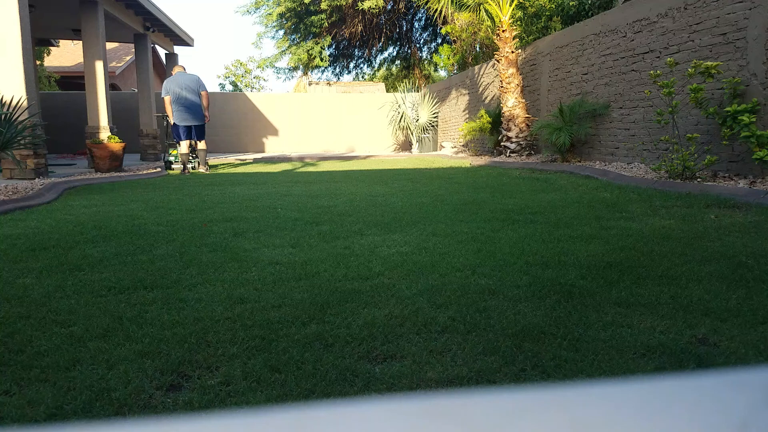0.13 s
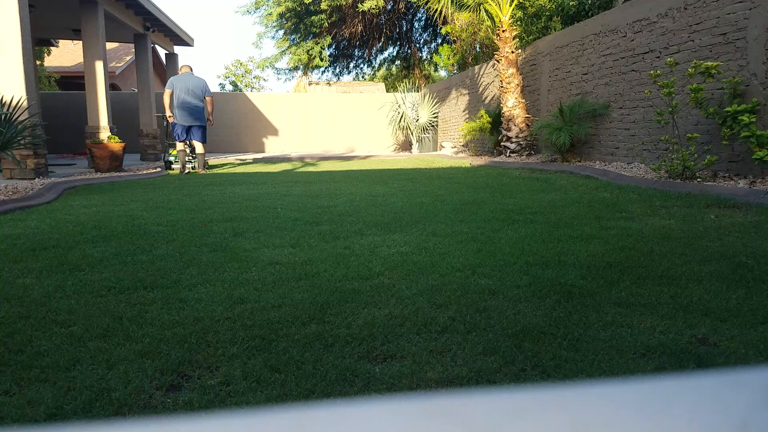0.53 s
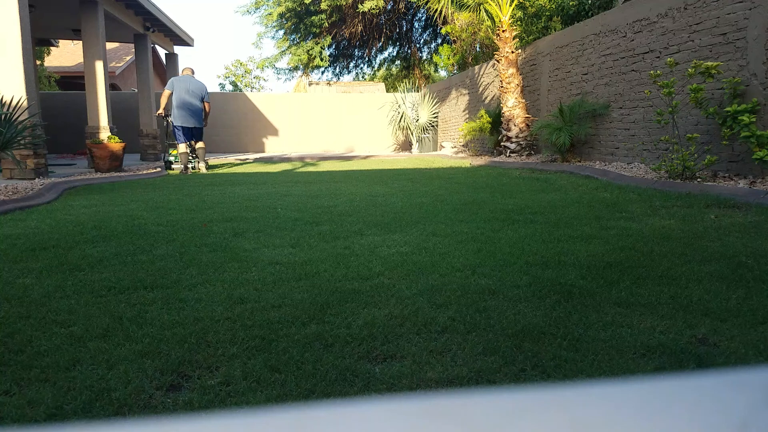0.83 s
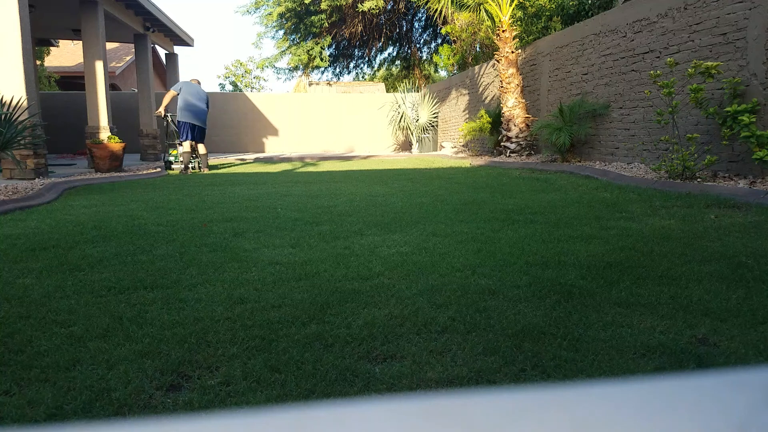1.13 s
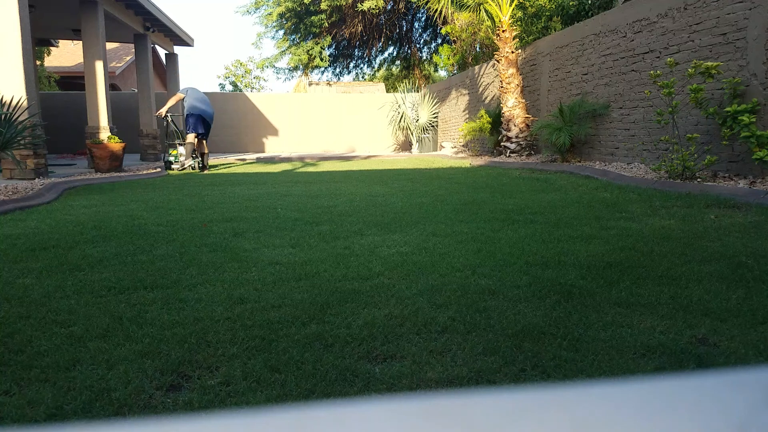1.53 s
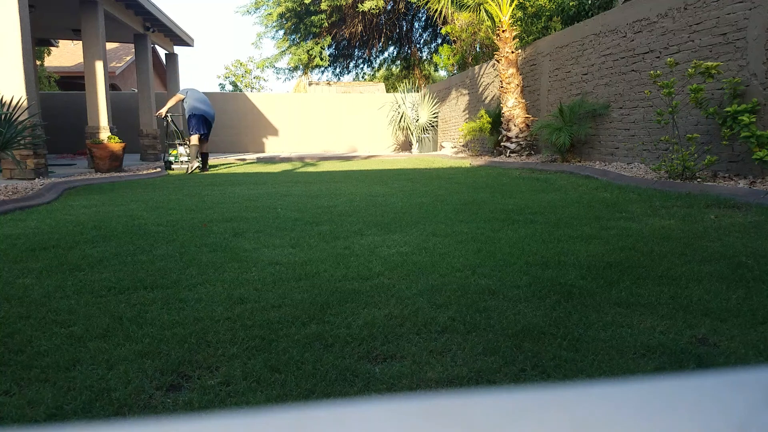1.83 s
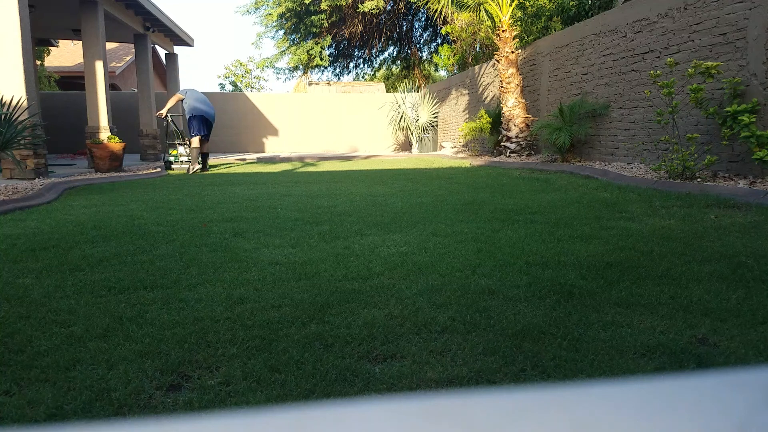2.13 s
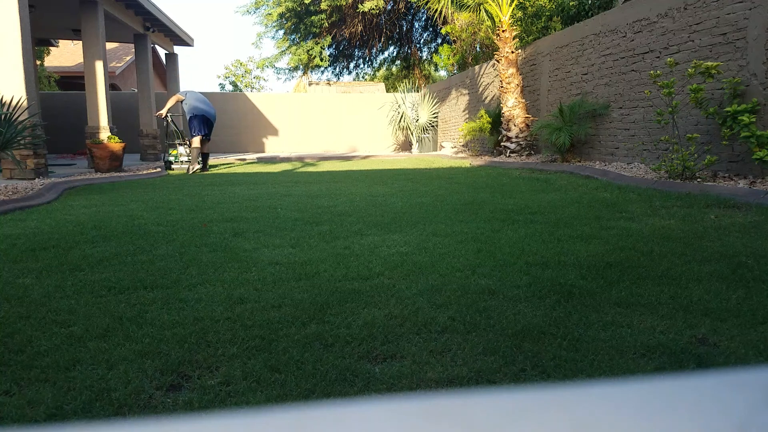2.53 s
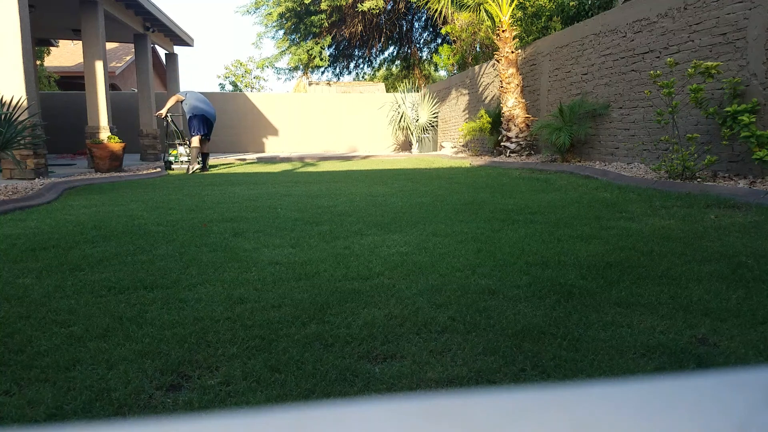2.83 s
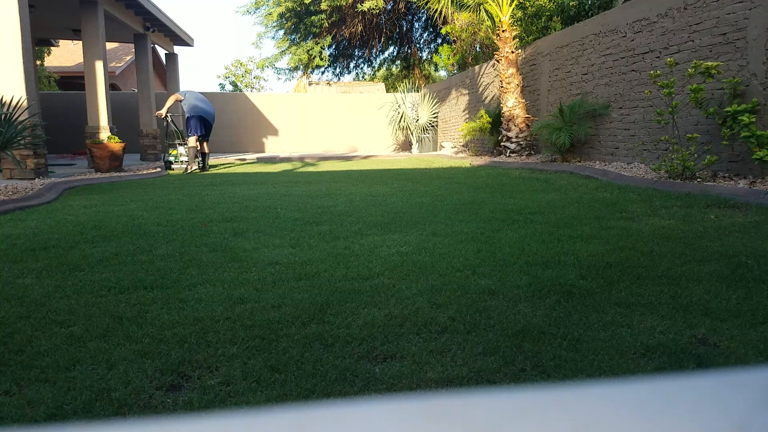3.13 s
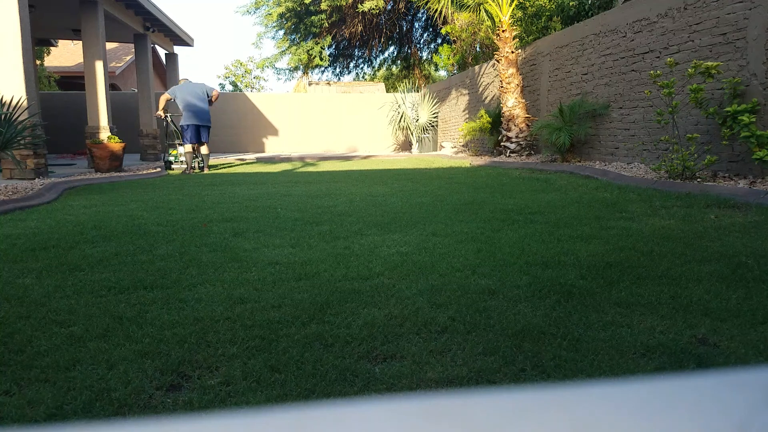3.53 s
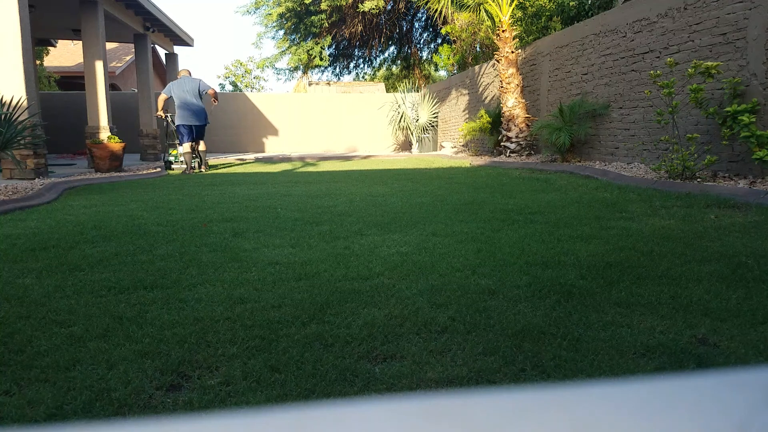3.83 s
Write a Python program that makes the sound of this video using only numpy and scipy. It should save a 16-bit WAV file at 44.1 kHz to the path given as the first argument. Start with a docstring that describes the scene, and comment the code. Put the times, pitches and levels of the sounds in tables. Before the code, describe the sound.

A lawn mower is pull-started at the far end of a walled backyard, heard in stereo. First a low hum fades and the handle clacks, then the cord hisses out and the engine rattles and begins firing.

```python
"""A walled backyard, heard through a stereo microphone with a mower at the far end.
A low machine hum and a faint insect lie over the outdoor air. The mower's handle clacks, the starter
cord hisses out, and the engine rattles round, catches and gathers speed. Each firing sends a pulse
and a gush of gas through the muffler, and the garden walls throw every one back."""
import sys
import numpy as np
from scipy import signal
from scipy.fft import rfft, irfft, next_fast_len
from scipy.io import wavfile
from scipy.ndimage import map_coordinates

SR = 44100
rng = np.random.default_rng(int(sys.argv[2]) if len(sys.argv) > 2 else 0)


def unload_audio(sound):
    """Save the sound as a 16-bit wav file, at the path given as the first command line argument."""
    columns = np.transpose(np.atleast_2d(sound))
    # keep every value between -1 and 1, then stretch to whole-number steps
    steps = np.round(np.clip(columns, -1, 1) * 32767)
    wavfile.write(sys.argv[1], SR, steps.astype(np.int16))


N = 176400
T = np.arange(N) / SR
SIDES = np.array([[.5], [-.5]])  # splits a difference between left and right

# the mower's balance at the microphone (frequency [Hz], left minus right [dB])
MOWER_BALANCE = [(100, -3.5), (380, -3), (700, 1), (1300, -4), (2400, -2.5), (4400, 1.5), (8000, 2.3),
                 (15000, 7)]


def amp(db):
    """Decibels to gain."""
    return 10 ** (np.asarray(db) / 20)


def unit(x):
    """Scale to rms 1."""
    return x / np.sqrt(np.mean(x ** 2) + 1e-20)


def along(points, hz):
    """Read (frequency [Hz], value) points on a log axis."""
    f, v = np.transpose(points)
    return np.interp(np.log(hz + 1), np.log(f + 1), v)


def curve(rows):
    """Join (time [s], value) points, one value per sample."""
    return np.interp(T, *np.transpose(rows))


def wobble(rate):
    """A smooth random curve, rate knots a second."""
    return map_coordinates(rng.standard_normal(400), [T * rate], mode="wrap")


def decay(start_s, t60_s):
    """Gain 1 until start_s, then falling 60 dB every t60_s."""
    return amp(-60 * np.maximum(T - start_s, 0) / t60_s)


def burst(start_s, attack_s, t60_s, hold_s=0):
    """A linear attack, with a decay that begins hold_s after the start."""
    return np.clip((T - start_s) / attack_s, 0, 1) * decay(start_s + hold_s, t60_s)


def filtered(x, response):
    """Apply a complex response, given as a function of frequency."""
    size = next_fast_len(N + SR // 2)
    return irfft(rfft(x, size) * response(np.fft.rfftfreq(size, 1 / SR)), size)[..., :N]


def coloured(x, spectrum):
    """Pass x through a minimum-phase filter with this spectral shape."""
    size = 16384
    cepstrum = irfft(np.log(amp(along(spectrum, np.fft.rfftfreq(size, 1 / SR)))))
    cepstrum[1:size // 2] *= 2
    cepstrum[size // 2 + 1:] = 0
    response = irfft(np.exp(rfft(cepstrum)))
    return signal.fftconvolve(x, response / np.linalg.norm(response))[:N]


def noise(spectrum):
    """Coloured noise of rms 1."""
    return unit(coloured(rng.standard_normal(N), spectrum))


def grains(per_s, spread_db):
    """Random tiny impacts of uneven size, rms 1."""
    hits = (rng.random(N) < per_s / SR) * rng.choice([-1, 1], N)
    return unit(hits * amp(spread_db * rng.standard_normal(N)))


def lean(x):
    """Give a stereo pair the mower's left-right balance."""
    return filtered(x, lambda f: amp(SIDES * along(MOWER_BALANCE, f)))


def yard(x, tail_db, near_db):
    """The mower reaches the left capsule first; scatter off posts and paving and a tail follow."""
    # reverberation of the yard (frequency [Hz], T60 [s])
    yard_t60 = [(100, 0.083), (500, 0.28), (3000, 0.64), (7000, 0.29), (15000, 0.18)]
    left_lead_s, near_t60_s = 0.0002936, 0.021
    hz, t, spectra = signal.stft(rng.standard_normal((2, SR // 2)), SR, nperseg=256)
    tail = signal.istft(spectra * amp(-60 * t / along(yard_t60, hz)[:, None]), SR, nperseg=256)[1]
    near = rng.standard_normal(tail.shape) * decay(0, near_t60_s)[:tail.shape[1]]
    response = amp(tail_db) * tail / np.linalg.norm(tail[0])
    response += amp(near_db) * near / np.linalg.norm(near[0])
    wet = signal.fftconvolve(x[None], response, axes=1)[:, :N]
    direct = filtered(x, lambda f: np.exp(2j * np.pi * f * left_lead_s * SIDES))
    return lean(direct + wet) / np.hypot(1, amp(near_db))


def scattered(source, apart_rad):
    """Many contacts at once: the capsules share one part, and each hears a part of its own."""
    shared = yard(source(), tail_db=-2.5, near_db=-7)
    separate = lean(np.array([source(), source()]))
    return np.cos(apart_rad) * shared + np.sin(apart_rad) * separate


def exhaust():
    """Each firing is a pressure pulse and a gush of gas through the muffler, echoed by the walls."""
    # firings (time [s], relative level [dB])
    firings = [(3.7405, -7.5), (3.7925, -4.5), (3.824, -3), (3.8635, 0), (3.900, -.5), (3.9335, -2),
               (3.9675, 0)]
    # air pumped through the muffler by the turning engine (time [s], level [dB])
    pumping = [(3.0, -61), (3.07, -53.5), (3.2, -54.5), (3.45, -55.5), (3.54, -39.5), (3.64, -39),
               (3.72, -32.5), (3.85, -27.5), (4, -33.5)]
    # gas noise leaving the muffler (frequency [Hz], level [dB])
    muffler = [(25, -18), (58, 2), (88, -7), (120, 5.5), (160, -7), (200, 0), (250, 1.5), (300, -7.5),
               (345, 3.5), (390, -2), (440, 4), (620, -12), (800, -20), (1500, -30), (5000, -47)]
    # wall echoes (delay to left [s], delay to right [s], level [dB])
    walls = [(.0037, .0034, -9), (.0112, .0110, -2), (.0215, .0219, -7)]
    pulse_db, gas_db, pulse_band_hz = -8.5, -26.5, [227, 505]
    thump_hz, thump_db = 118, -13  # the engine block's thump, level relative to the pulse
    pulses, gush = np.zeros(N), amp(curve(pumping))
    for s, db in firings:
        pulses[round(s * SR)] += amp(db + pulse_db)
        gush += amp(db + gas_db) * burst(s, attack_s=0.0024, t60_s=0.25)
    band = signal.butter(3, pulse_band_hz, "bandpass", fs=SR, output="sos")
    ring = signal.sosfilt(band, signal.unit_impulse(SR // 10))
    thump = amp(thump_db) * decay(0, t60_s=0.065) * np.sin(2 * np.pi * thump_hz * T)
    pop = ring / np.abs(ring).max() + thump[:len(ring)]
    puffs = signal.fftconvolve(pulses, pop)[:N] + gush * noise(muffler)
    echoes = lambda f: 1 + sum(amp(db) * np.exp(-2j * np.pi * f * np.array([[left], [right]]))
                               for left, right, db in walls)
    return filtered(yard(puffs, tail_db=-8.5, near_db=-14), echoes)


def rattle():
    """Dense small impacts of the turning engine ring the deck and casing."""
    # strength of the rattle (time [s], level [dB])
    rattle_level = [(3.0, -53.5), (3.06, -51.5), (3.15, -55.5), (3.36, -55), (3.378, -41.5), (3.44, -47),
                    (3.465, -36.5), (3.508, -42), (3.518, -26.5), (3.56, -32), (3.64, -30), (3.72, -26.5),
                    (3.85, -24.5), (4, -26)]
    # modes of the deck (frequency [Hz], width [Hz], level [dB])
    deck_modes = [(545, 99, -1), (708, 56, -4.5), (969, 93, -2), (1331, 61, 1), (2297, 32, -11.5),
                  (2875, 147, -18.5), (3200, 160, -20.5)]
    # response of the casing (frequency [Hz], level [dB])
    casing_spectrum = [(90, -19.5), (150, -8), (250, 0), (480, 2), (700, 12), (830, -4.5), (1340, -4),
                       (1700, -4.5), (2900, -13.5), (6000, -19), (11600, -36), (15500, -36)]
    deck_db, casing_db = -4.5, -4

    def deck_response(f):
        return sum((-1) ** k * amp(db) * 1j * f * width / (hz * hz - f * f + 1j * f * width)
                   for k, (hz, width, db) in enumerate(deck_modes))

    def impacts():
        deck = amp(deck_db) * unit(filtered(grains(per_s=450, spread_db=2), deck_response))
        casing = amp(casing_db) * unit(coloured(grains(per_s=3000, spread_db=4.5), casing_spectrum))
        return amp(curve(rattle_level)) * (deck + casing)

    return scattered(impacts, apart_rad=0.73)


def starter():
    """The cord hisses out, and the engaged starter rasps once in every engine cycle."""
    # hiss of the running cord (time [s], level [dB])
    cord_level = [(3.45, -78), (3.495, -46.5), (3.531, -75), (3.537, -33), (3.56, -44.5), (3.58, -34.5),
                  (3.62, -41), (3.665, -31.5), (3.7, -40.5), (3.76, -54), (4, -56)]
    # colour of the hiss (frequency [Hz], level [dB])
    cord_spectrum = [(2000, 6), (4700, 3), (7500, -7), (8500, 3.5), (9400, -4), (10300, -2), (11700, -12),
                     (13000, 3), (13600, -4), (14300, 1), (15500, -8)]
    # metallic rasps (time [s], level [dB])
    rasps = [(3.707, -25.5), (3.764, -24), (3.811, -23.5), (3.853, -24), (3.889, -25.5), (3.926, -25),
             (3.962, -36), (3.997, -21)]
    # colour of a rasp (frequency [Hz], level [dB])
    rasp_spectrum = [(900, -6.5), (2000, 3), (2700, 3), (3050, 0.5), (3330, 4.5), (3700, 1), (5500, -1),
                     (8000, -10.5), (10500, -13.5), (13200, -7), (15500, -8.5)]
    bursts = sum(amp(db) * burst(s, attack_s=.004, hold_s=.012, t60_s=.057) for s, db in rasps)

    def friction():
        hiss = unit(coloured(grains(per_s=6000, spread_db=1.5), cord_spectrum))
        rasp = coloured(bursts * grains(per_s=5000, spread_db=2.5), rasp_spectrum)
        return amp(curve(cord_level)) * hiss + rasp

    return scattered(friction, apart_rad=0.93)


def handle():
    """Each contact is a brief crack coloured by the mower's handle."""
    # clacks (time [s], level [dB])
    clacks = [(1.881, -36), (1.887, -39), (1.926, -45), (3.018, -54), (3.031, -52.5)]
    # response of the handle (frequency [Hz], level [dB])
    handle_spectrum = [(300, -19), (800, -14), (1150, 3), (1600, -2), (2300, -7.5), (3000, -6),
                       (4000, -2.5), (4900, -7), (5500, -1.5), (6500, -6), (9000, -16), (15500, -17)]
    blows = sum(amp(db) * decay(s, t60_s=0.041) * (T >= s) for s, db in clacks)
    return yard(coloured(blows * rng.standard_normal(N), handle_spectrum), tail_db=1, near_db=3)


def hum():
    """A distant machine hums low; a mains hum near 120 Hz beats against a machine tone just below it."""
    # the machine's low tone (time [s], level [dB])
    hum_level = [(0.1, -39.5), (0.54, -41), (0.7, -41), (0.95, -40), (1.06, -42.5), (1.3, -39), (1.52, -43),
                 (1.55, -34), (1.58, -39.5), (1.61, -41), (2.25, -52.5), (3.33, -51.5), (3.45, -53.5)]
    hum_hz, mains_hz = 57.2, 119.9
    beat_dip_s, beat_period_s, beat_db = .1, .355, -6
    level = curve(hum_level)
    low = amp(level) * np.sin(2 * np.pi * hum_hz * T + 0.092 * wobble(4.56))
    upper_hum_db = level.max() + 1.173 * (level - level.max())  # falls further than the low tone
    upper_hum_db += 0.5 + 0.57 * wobble(8.44)
    phase = 2 * np.pi * mains_hz * T + 0.2 * wobble(7.02)
    beat = 2 * np.pi * (T - beat_dip_s) / beat_period_s
    upper_hum = amp(upper_hum_db) * (np.sin(phase) - amp(beat_db) * np.sin(phase - beat))
    return np.sqrt(2) * (low + upper_hum)


def rumble(gain_db=0):
    """Low noise that drops away before the engine turns."""
    # strength of the rumble (time [s], level [dB])
    rumble_level = [(0.1, -44.5), (1.2, -44), (1.52, -43), (1.78, -47.5), (2.05, -58), (3.5, -57)]
    # colour of the rumble (frequency [Hz], level [dB])
    rumble_spectrum = [(20, -11), (35, -14.5), (60, -10), (115, 4), (180, -5.5), (260, -11), (500, -27.5),
                       (1500, -90)]
    return amp(curve(rumble_level) + gain_db) * noise(rumble_spectrum)


def insect():
    """Faint, evenly spaced chirps in a narrow band, each with a wall echo."""
    first_s, gap_s, width_s = .079, .0945, 0.0058
    centre_hz, width_hz, level_db = 7180, 400, -70
    echo_s, echo_db = 0.016, -4.5
    offset = lambda delay: (T - delay - first_s + gap_s / 2) % gap_s - gap_s / 2
    chirps = lambda delay: np.exp(-.5 * (offset(delay) / width_s) ** 2)
    band = filtered(rng.standard_normal((2, N)), lambda f: np.exp(-((f - centre_hz) / width_hz) ** 2))
    return amp(level_db) * (chirps(0) + amp(echo_db) * chirps(echo_s)) * unit(band)


def air():
    """Outdoor air, alike at both capsules in the bass and unrelated in the treble."""
    # colour of the air (frequency [Hz], level [dB])
    air_spectrum = [(120, -23.5), (190, -21.5), (240, -6.5), (360, -6.5), (650, -5.5), (705, 2),
                    (770, -4.5), (900, -5), (1200, -15.5), (1500, -19), (2100, -21.5), (3400, -37.5),
                    (5500, -37.5), (9500, -39), (14000, -37), (15500, -35)]
    # left-right likeness (frequency [Hz], correlation [-1 to 1])
    likeness = [(130, 1), (290, 0.59), (640, -0.9), (1400, -0.024), (3000, -0.075)]
    level_db = -47
    angle = lambda f: np.arccos(np.clip(along(likeness, f), -1, 1)) / 2
    mid = filtered(noise(air_spectrum), lambda f: np.cos(angle(f)))
    side = filtered(noise(air_spectrum), lambda f: np.sin(angle(f)))
    return amp(level_db + 0.13 * wobble(3.23)) * np.array([mid + side, mid - side])


def scene():
    """Hum and rumble slightly right of centre, air and insect all round, the mower down the yard."""
    bass = (hum() + rumble()) * amp([[-1], [1.1]])
    background = bass + air()
    background += rumble(gain_db=-7.5) * np.array([[1], [-1]])  # opposite polarity widens the rumble
    return background + insect() + handle() + rattle() + starter() + exhaust()


def record(dry):
    """The microphone opens after a moment and passes nothing above its band limit."""
    open_s, top_hz = .0725, 15800
    return filtered(dry * (T >= open_s), lambda f: f < top_hz)


dry = scene()
out = record(dry)
unload_audio(out)
```